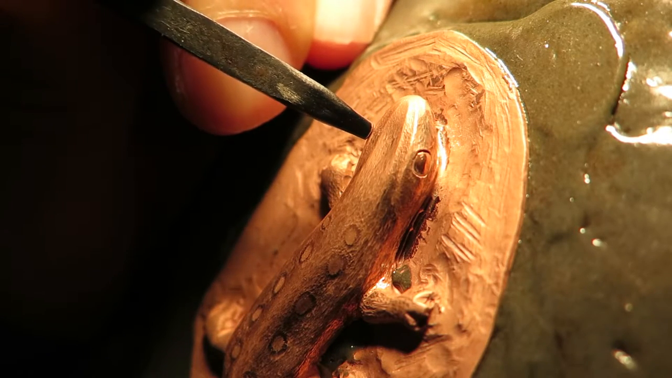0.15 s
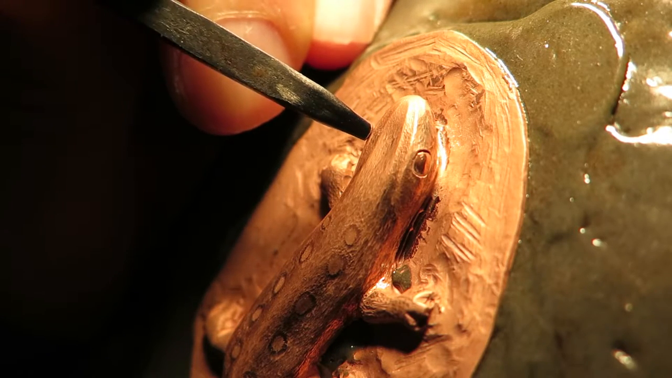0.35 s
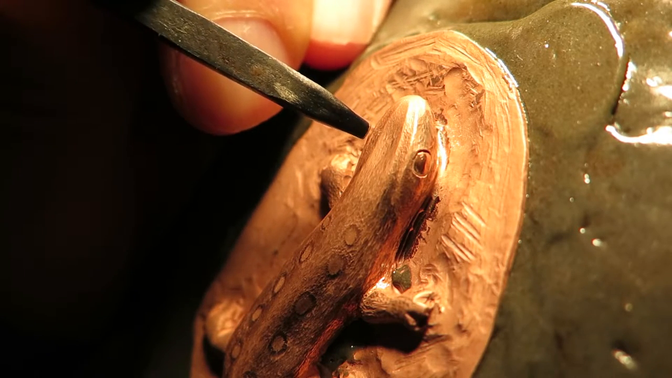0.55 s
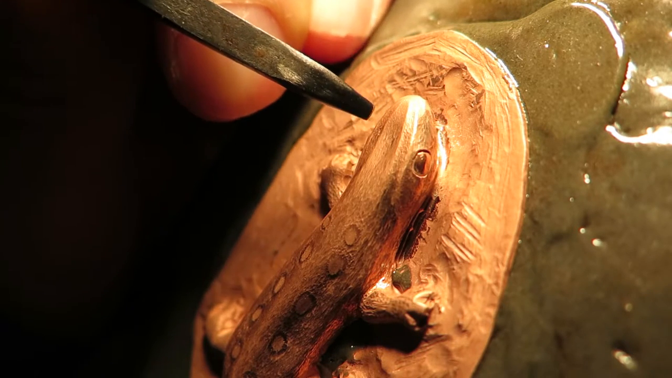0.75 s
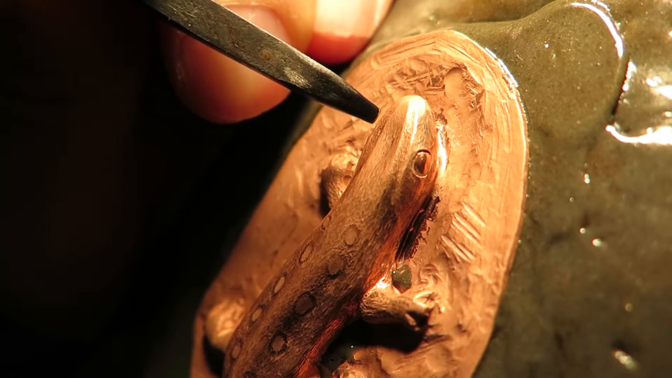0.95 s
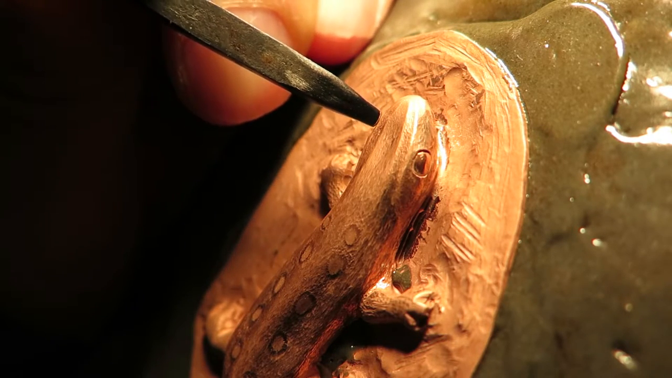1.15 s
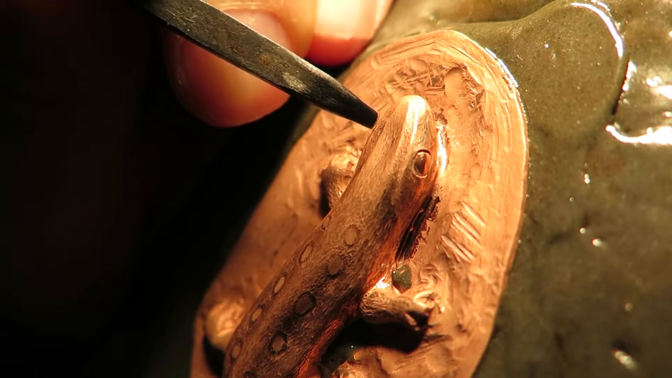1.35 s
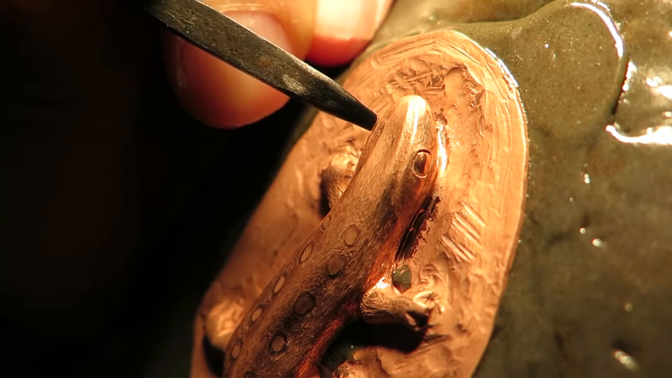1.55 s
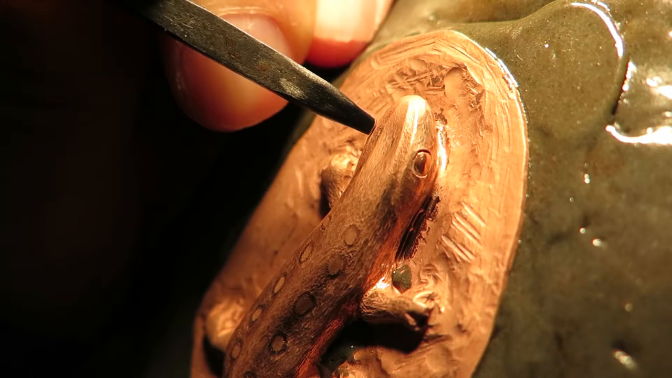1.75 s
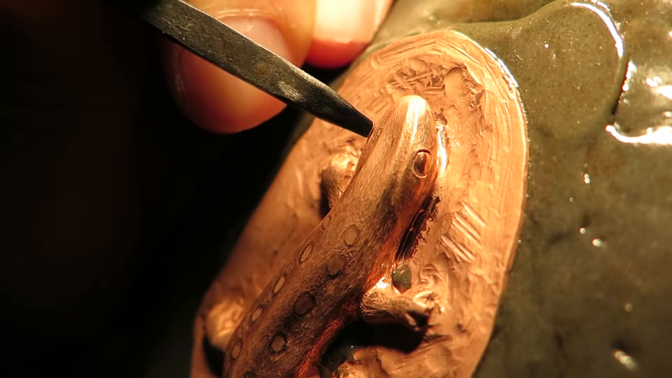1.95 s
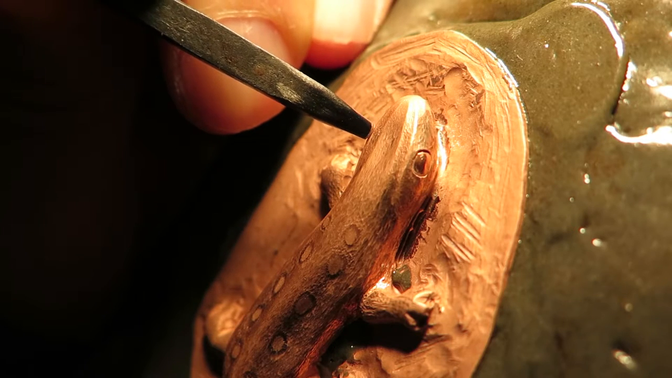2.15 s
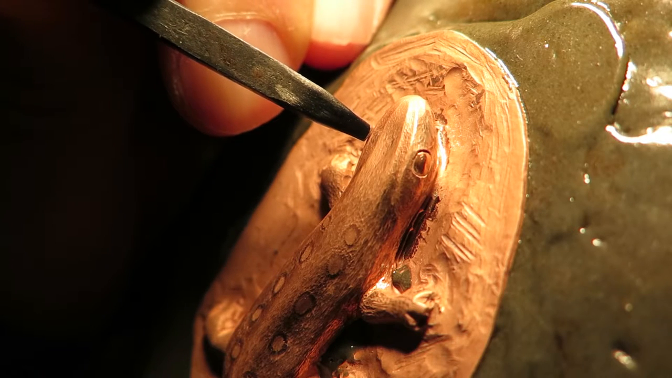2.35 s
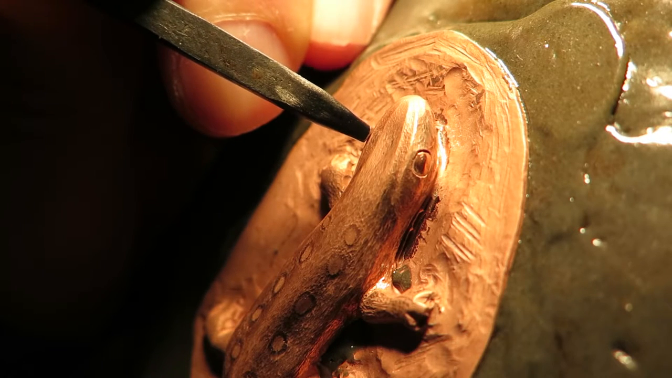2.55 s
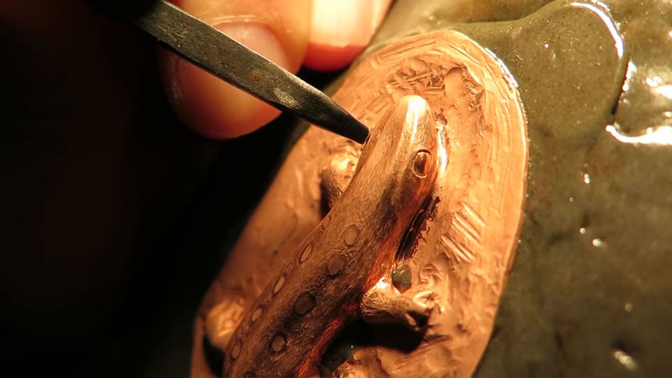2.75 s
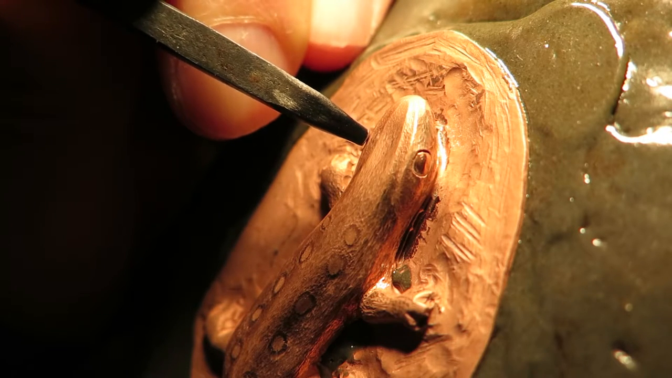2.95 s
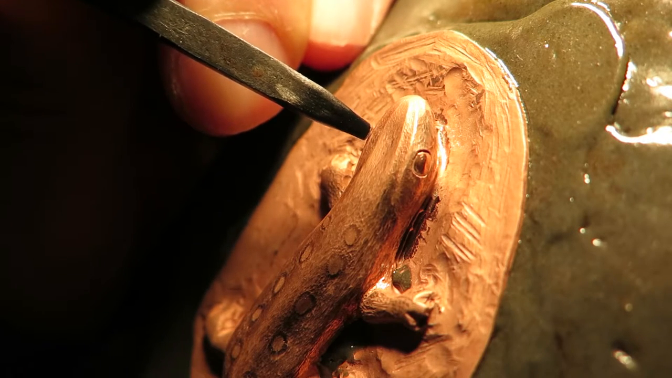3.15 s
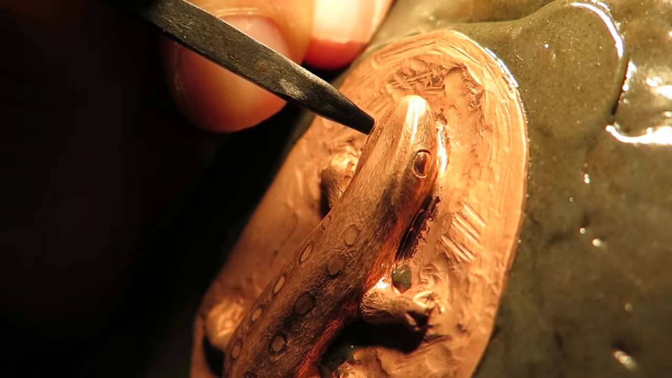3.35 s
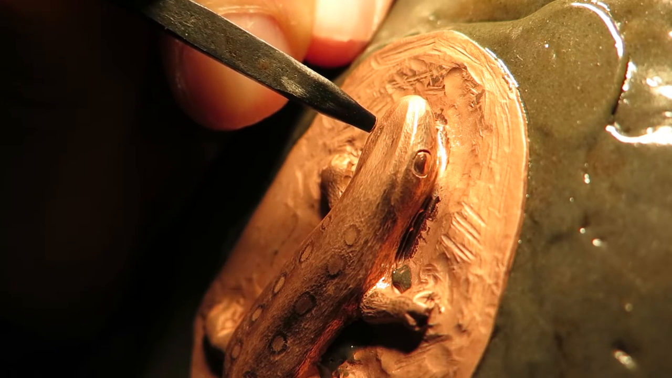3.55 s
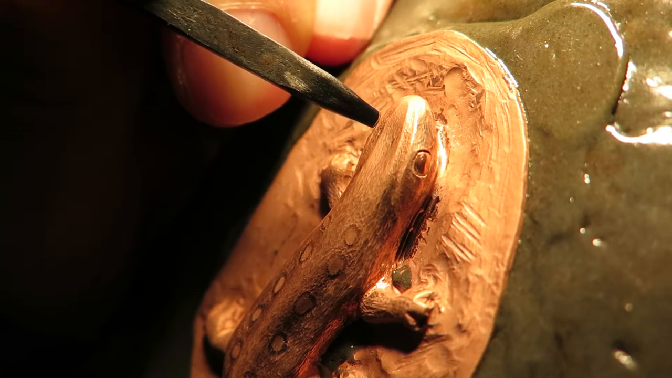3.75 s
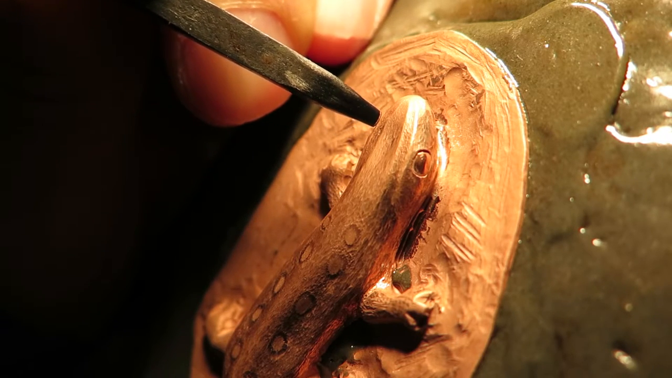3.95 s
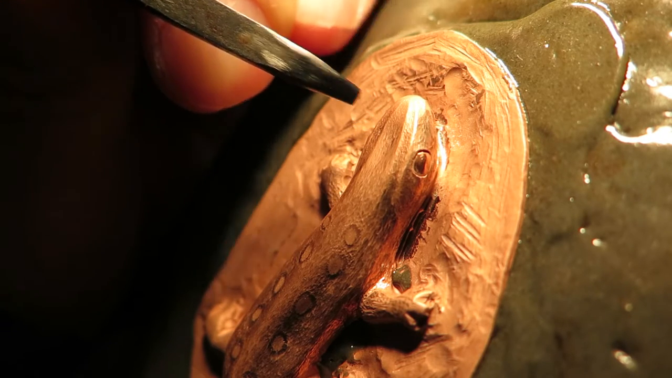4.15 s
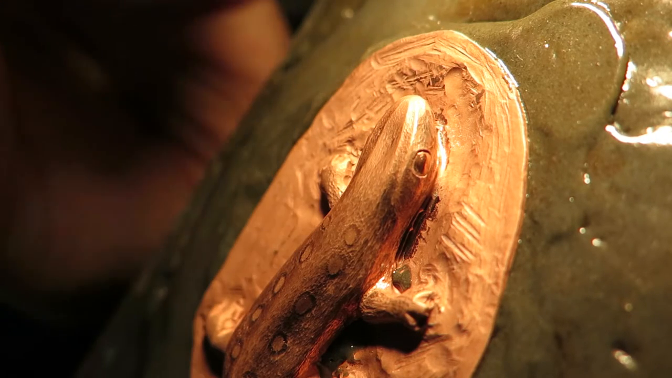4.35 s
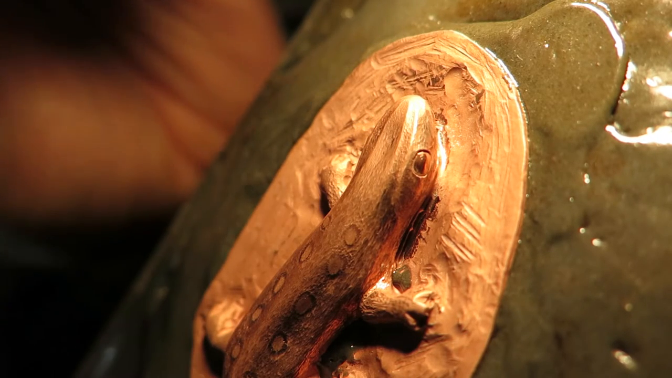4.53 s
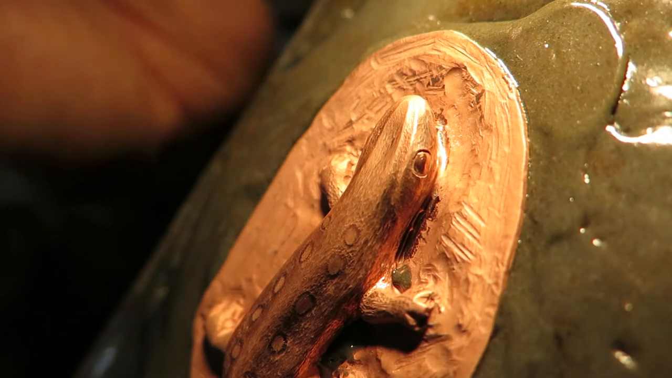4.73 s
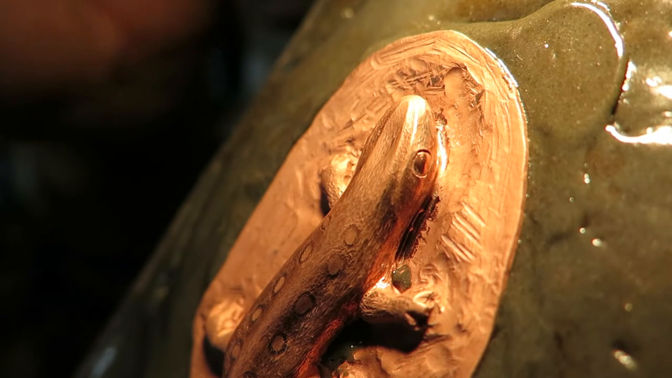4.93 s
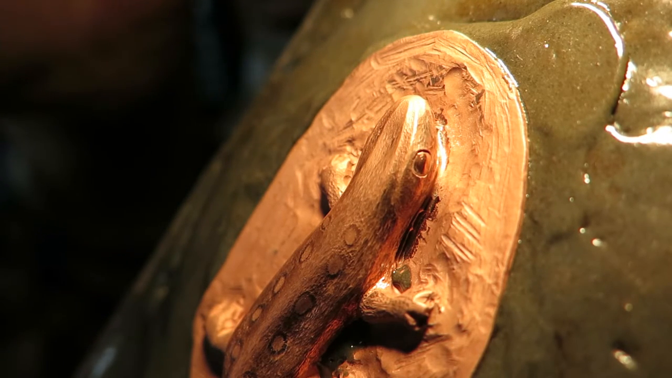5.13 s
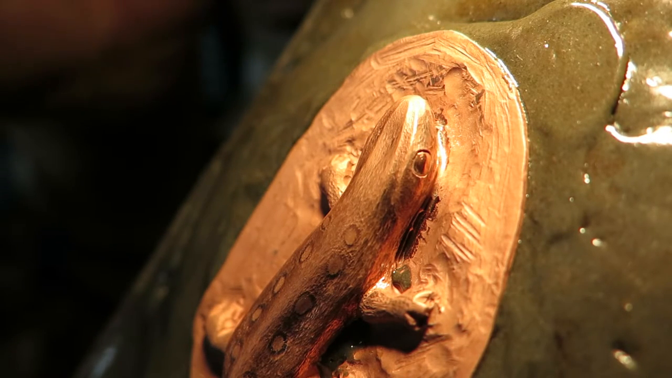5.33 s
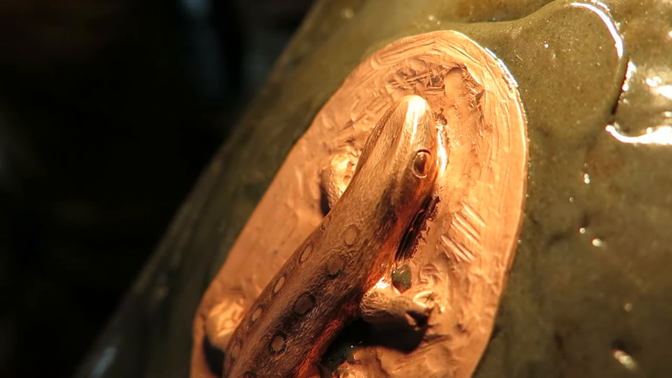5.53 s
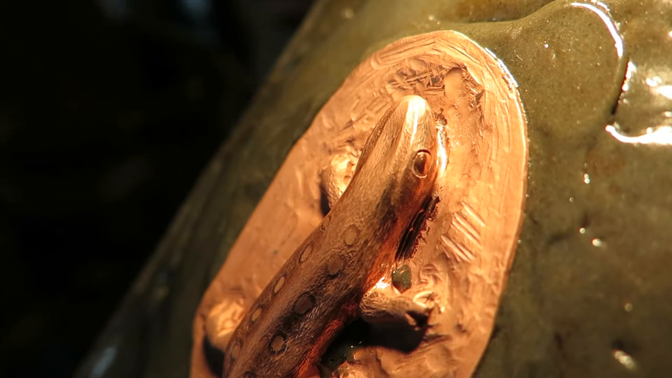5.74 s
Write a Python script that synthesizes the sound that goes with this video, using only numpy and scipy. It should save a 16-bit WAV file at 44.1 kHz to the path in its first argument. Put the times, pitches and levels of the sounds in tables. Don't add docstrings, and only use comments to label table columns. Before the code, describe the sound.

Close stereo microphones catch a small hammer tapping a steel punch on a metal plaque bedded in an iron bowl. About twenty sharp, dry clinks come unevenly, some with a hollow knock, until about four seconds. Then only broad room hiss remains, with faint cloth rustles near the end.

```python
import sys
import numpy as np
from scipy import signal
from scipy.fft import rfft, irfft, next_fast_len
from scipy.io import wavfile
from scipy.ndimage import map_coordinates

SR = 44100
rng = np.random.default_rng(int(sys.argv[2]) if len(sys.argv) > 2 else 0)


def ratio_of_db(decibels):
    return 10 ** (np.asarray(decibels, float) / 20)


def store_wav(level_fs):
    pcm = np.round(np.clip(np.atleast_2d(level_fs), -1, 1) * 32767)
    wavfile.write(sys.argv[1], SR, pcm.T.astype(np.int16))


N = 255336
TIME = np.arange(N) / SR

# (time [s], knock into the bowl [dB], sideways slap [dB],
# thrust along the punch [dB], click of the faces [dB])
BLOWS = [(0.0458, -14.5, -26, -17, -11.5), (0.1895, -17.5, -29, -18.5, -20),
         (0.3397, -17.5, -32, -19.5, -23.5), (0.521, -30.5, -26, -27.5, -29),
         (1.1715, -30, -14, -24, -12.5), (1.3985, -23.5, -21.5, -20.5, -22.5),
         (1.5646, -21.5, -16, -14.5, -17.5), (1.8029, -19, -27, -17, -30), (1.9937, -9, -21, -16.5, -8.5),
         (2.1618, -20.5, -34, -23.5, -28), (2.2965, -38.5, -36, -43, -36), (2.4405, -23.5, -29, -20, -26),
         (2.6144, -23, -7, -16, -8), (2.7745, -23, -29, -21, -27.5), (2.9694, -48, -47, -43, -49),
         (3.157, -19.5, -20, -12.5, -16), (3.3255, -25.5, -24, -30, -22.5),
         (3.7142, -12, -21.5, -13, -13.5), (3.899, -15.5, -26, -13.5, -23), (3.9724, -32, -42, -44, -50)]
# (delay [s], level [dB])
WALL_ECHO = (.021, -19.5)
# (frequency [Hz], level [dB])
MIC_RESPONSE = [(20, -5.5), (60, 0.5), (14700, 1), (15300, -14.5), (16300, -28)]


def taps():
    out = np.zeros((2, N + SR))
    t = np.arange(SR // 4) / SR
    gain = gain_db()
    wall_s, wall_db = WALL_ECHO
    for s, knock_db, slap_db, thrust_db, face_db in BLOWS:
        thud_db = max(thrust_db - 14, slap_db - 20)
        knock = ratio_of_db(knock_db + 23.5) * bowl(t, thud_db - knock_db)
        knock = knock + ratio_of_db(wall_db) * later(knock[::-1], wall_s)

        plaque_db = -31.5 + 0.75 * (slap_db + 24)
        rim_db = 1.3 + slap_db + 0.4 * (face_db - slap_db)
        clinks = ratio_of_db(20.5) * clink([plaque_db, slap_db - 1.16, thrust_db, face_db, rim_db], t)
        rebound = np.clip(0.1 - 0.03 * (slap_db - knock_db), 0, 1)
        clinks = clinks + rebound * later(clinks, 0.0015)

        room = echo(ratio_of_db(-18) * knock + ratio_of_db(-14.5) * clinks)
        start = round(s * SR)
        out[:, start:start + len(t)] += ratio_of_db(-gain[start]) * (knock + clinks + room)
    return filtered(out[:, :N], lambda hz: ratio_of_db(along(MIC_RESPONSE, hz)))


# (frequency [Hz], level [dB], t60 [s], polarity [+1 or -1], left lead [rad])
BOWL_MODES = [(675.3, -9.5, 0.097, 1, 0), (797, -13.5, 0.11, -1, 0), (1034.2, -6.5, 0.15, 1, -1.1),
              (1053.5, -8, 0.13, -1, 0.24), (1113, -9.5, 0.076, -1, -.2), (1293, -10.5, 0.02, 1, -0.16),
              (1604, 4, 0.019, 1, -0.92), (1783, -4.5, 0.072, -1, -0.32), (1966, -3.5, 0.0085, 1, -0.83),
              (2218, 5.5, 0.053, 1, -0.84), (2297, 6.5, 0.015, 1, -1.2), (2673, -3.5, 0.039, -1, -0.077),
              (2830, -15.5, 0.096, 1, -0.056), (2970, 0, 0.061, 1, 0.021)]


def bowl(t, thud_db):
    hz, db, t60, polarity, lead = np.transpose(BOWL_MODES)
    db = db + rng.normal(0, 0.8, len(hz))
    half_cycle = (polarity < 0)[None, :, None] / (2 * hz[None, :, None])
    iron = ring(hz, db, t60, -1 + 0 * hz, lead, t + half_cycle)
    thud = ring([165, 330, 510], [-12, 0, 2], [0.12, 0.025, 0.05], [0, 4, 3], [0, 1, 1], t)
    contact = 1 - np.exp(-t / 0.000085)
    return (whole(iron) + ratio_of_db(thud_db - 8.5) * whole(thud)) * contact


# (frequency [Hz], level [dB], t60 [s], left-right balance [dB], left lead [rad])
PLAQUE_MODES = [(3392, 4.5, 0.022, 6, 0.34), (3640, 6, 0.018, 8.5, 0.98), (4320, 3, 0.022, 5, 0.6)]
SHANK_MODES = [(4975, 1.5, 0.024, 2.5, 1.6), (5860, 0.5, 0.031, -5, 3.08), (6500, 2, 0.013, -3.5, 3.2)]
NECK_MODES = [(7390, -6.5, 0.014, -4, 2), (8410, 4.5, 0.015, -6, -2.5), (9210, -7, 0.0078, 5.5, -3)]
FACE_MODES = [(9660, -5.5, 0.013, 5, -2.5), (10360, 2.5, 0.0073, -12, -3.5), (11100, 1.5, 0.0044, 13, 1),
              (12800, -12.5, 0.019, 9.5, 5.5), (11000, -13.5, 0.012, -2, 2)]
RIM_MODES = [(13860, -2, 0.0033, -13, 2.2), (13680, 1, 0.0098, -17.5, 3.9)]
PART_CENTRES = [3740, 6060, 8800, 10500, 13900]


def clink(parts_db, t):
    parts = (PLAQUE_MODES, SHANK_MODES, NECK_MODES, FACE_MODES, RIM_MODES)
    rings = sum(ratio_of_db(db) * whole(steel(modes, t)) for db, modes in zip(parts_db, parts))
    common, own = rng.standard_normal((2, 2, len(t)))
    noise = 1.06 * common[0] * np.array([[1], [-1]]) + 0.69 * own
    colour = [(1500, parts_db[0] - 11)] + list(zip(PART_CENTRES, parts_db))
    crack = filtered(noise, lambda hz: ratio_of_db(along(colour, hz))) * ratio_of_db(-60 * t / 0.008)
    return rings + 0.45 * crack


def steel(modes, t):
    hz, db, t60, balance_db, lead = np.transpose(modes)
    shift, strength, phase = rng.standard_normal((3, len(hz)))
    return ring(hz * (1 + 0.0064 * shift), db + 2.2 * strength, t60, balance_db, lead + 0.24 * phase, t)


def ring(hz, db, t60, balance_db, lead, t):
    half = np.array([[[0.5]], [[-0.5]]])

    def column(values):
        return np.asarray(values)[None, :, None]

    wave = np.sin(2 * np.pi * column(hz) * t + half * column(lead))
    decay = ratio_of_db(column(db) + half * column(balance_db) - 60 * t / column(t60))
    return np.sum(decay * wave, axis=1)


# (frequency [Hz], t60 [s])
ROOM_DECAY = [(200, 0.23), (1000, 0.36), (4000, 0.16), (12000, 0.1)]


def echo(x):
    hz, t, z = signal.stft(rng.standard_normal((2, SR // 4)), SR, nperseg=256)
    fading = z * ratio_of_db(-60 * t / along(ROOM_DECAY, hz)[:, None])
    tail = signal.istft(fading, SR, nperseg=256)[1]
    return signal.fftconvolve(x, tail / np.linalg.norm(tail[0]), axes=1)[:, :x.shape[1]]


# (frequency [Hz], level per Hz [dB])
MID_HISS = [(15, -58), (25, -21), (36, -9), (49, 0.5), (114, -3.5), (243, -4.5), (286, -4.5), (492, -6.5),
            (662, -6), (5330, -13.5), (11400, -23), (14500, -26.5), (16200, -38.5)]
# (frequency [Hz], level per Hz [dB])
SIDE_HISS = [(15, -70.5), (25, -27.5), (134, -4.5), (271, -2), (892, -11), (1200, -13.5), (2300, -22.5),
             (3020, -22.5), (4660, -26), (11400, -29.5), (16200, -37.5)]


def hiss(colour, db):
    return ratio_of_db(db) * unit(filtered(rng.standard_normal(N), lambda hz: ratio_of_db(along(colour, hz))))


# (frequency [Hz], rms level [dB])
HUM_TONES = [
    (59.2, -61.5),
    (290.7, -67),
]


def hum():
    return sum(ratio_of_db(db + 1.5 + 1.2 * wobble(3.97)) * np.sin(2 * np.pi * hz * TIME) for hz, db in HUM_TONES)


# (time [s], level [dB])
MOTOR_LEVEL = [(0, -50), (.5, -51), (1.1, -53.5), (1.7, -57.5), (2.2, -55.5), (3.2, -55), (4, -65),
               (5.79, -86)]


def motor():
    rumble = unit(filtered(rng.standard_normal(N), band(125, 79)))
    return ratio_of_db(np.interp(TIME, *np.transpose(MOTOR_LEVEL)) + 1.2 * wobble(4.6)) * rumble


# (time [s], level [dB], length [s])
BRUSHES = [
    (4.325, -54.5, 0.026),
    (4.6, -61, .05),
    (5.05, -57, .025),
    (5.61, -59.5, .05),
    (5.76, -54, 0.14),
]


def sleeve():
    cloth = unit(filtered(rng.standard_normal((2, N)), band(11500, 6000)))
    swells = sum(ratio_of_db(db) * np.exp(-((TIME - s) / length) ** 2) for s, db, length in BRUSHES)
    return ratio_of_db(2.7 * wobble(60)) * swells * cloth


def workshop():
    mid = hiss(MID_HISS, -48) + hum() + motor()
    side = hiss(SIDE_HISS, -46)
    return np.array([mid + side, mid - side]) * ratio_of_db(0.4 * wobble(3)) + sleeve()


def unit(x):
    return x / np.sqrt(np.mean(x ** 2) + 1e-20)


def whole(x):
    return x / np.linalg.norm(x)


def later(x, s):
    return np.pad(x, ((0, 0), (round(s * SR), 0)))[:, :x.shape[1]]


def along(points, hz):
    f, v = np.transpose(points)
    return np.interp(np.log(hz + 1), np.log(f + 1), v)


def filtered(x, response):
    n = x.shape[-1]
    m = next_fast_len(n + 8192)
    return irfft(rfft(x, m) * response(np.fft.rfftfreq(m, 1 / SR)), m)[..., :n]


def wobble(rate):
    return map_coordinates(rng.standard_normal(int(N * rate / SR) + 4), [TIME * rate])


def band(centre_hz, width_hz):
    return lambda f: (1j * f * width_hz / (centre_hz ** 2 - f * f + 1j * f * width_hz)) ** 2


def scene():
    return taps() + workshop()


def gain_db(release_db=17, attack_s=0.0083, start_db=-5):
    need = np.zeros(N)
    need[0] = level_db = start_db
    since = 0
    for s, *_, face_db in BLOWS:
        recovered = min(level_db + release_db * (s - since), 0)
        overload = 1.065 * (-19 - face_db)
        level_db = min(recovered - 1, overload)
        need[round(s * SR) + 30] = level_db
        since = s
    climb = release_db * TIME
    held = np.minimum.accumulate(need - climb) + climb
    keep = np.exp(-1 / (attack_s * SR))
    return signal.lfilter([1 - keep], [1, -keep], held - held[0]) + held[0]


def band_limit(x):
    return signal.sosfilt(signal.butter(12, 16330, fs=SR, output="sos"), x)


# (frequency [Hz], level [dB])
BAND_LIMIT = [(15700, 0), (16300, -4), (16700, -25)]


def record(dry):
    x = dry * ratio_of_db(gain_db())
    x = x / (1 + np.abs(x) ** 12) ** (1 / 12)
    x = filtered(x, lambda hz: ratio_of_db(along(BAND_LIMIT, hz)))
    return band_limit(x)


dry = scene()
out = record(dry)
store_wav(out)
```